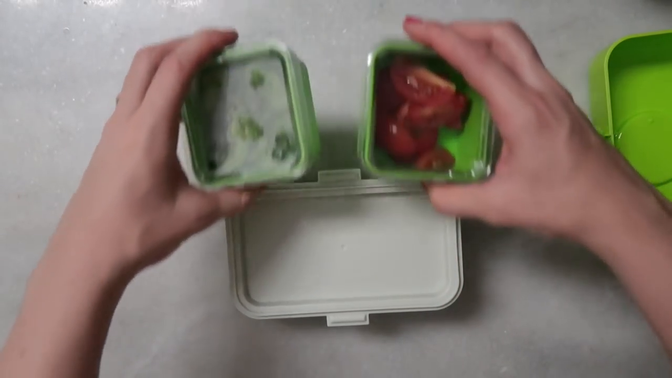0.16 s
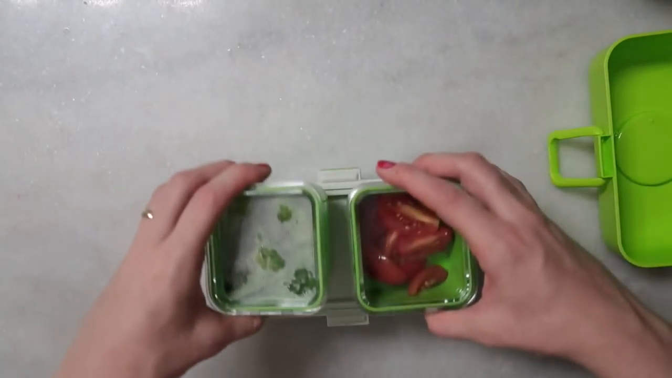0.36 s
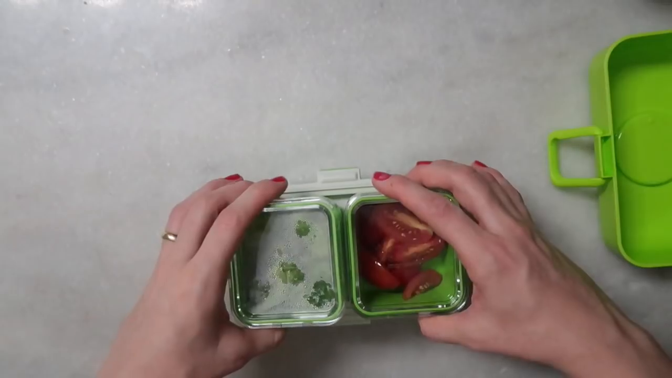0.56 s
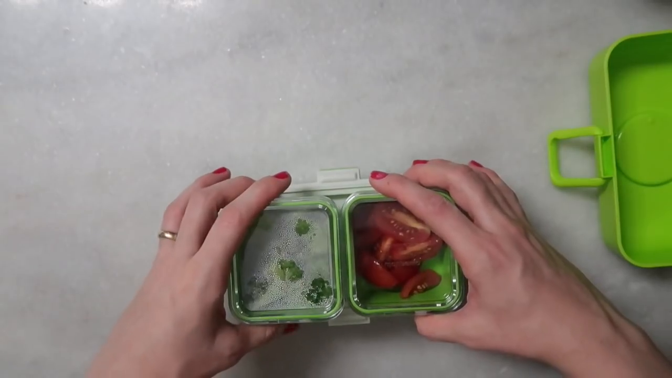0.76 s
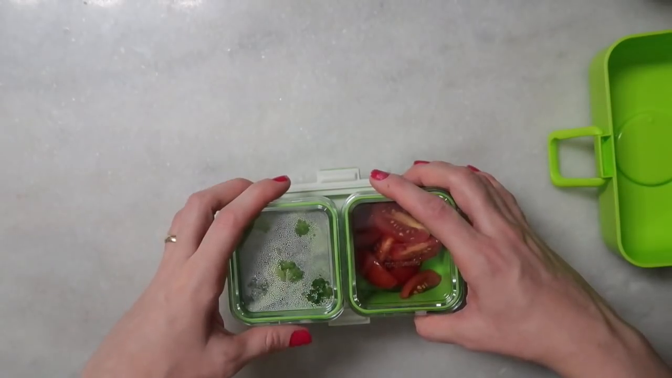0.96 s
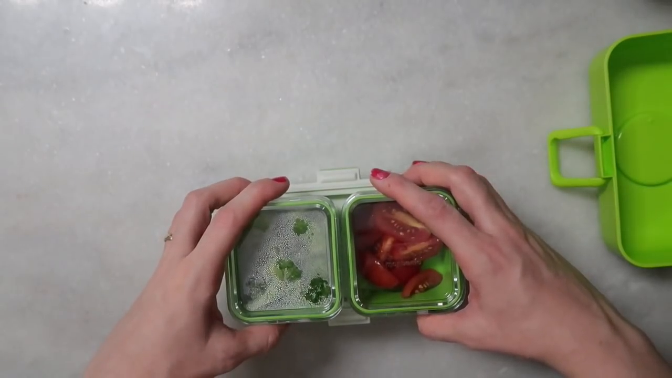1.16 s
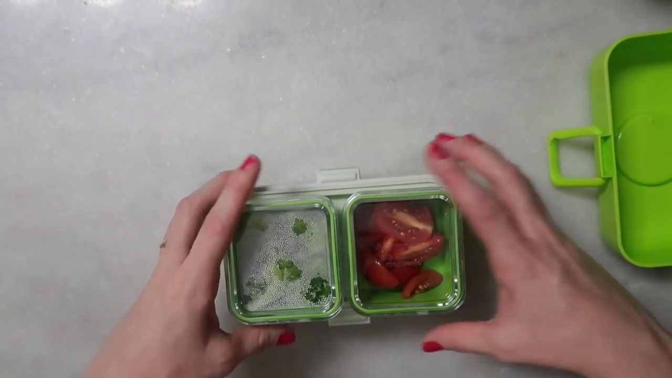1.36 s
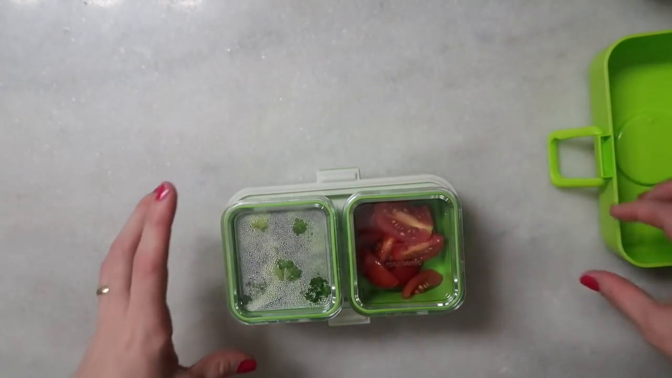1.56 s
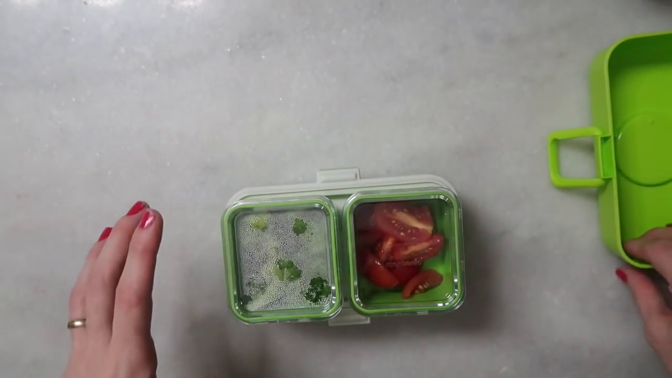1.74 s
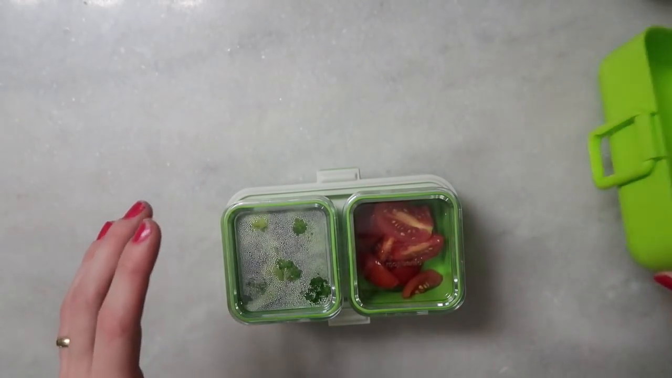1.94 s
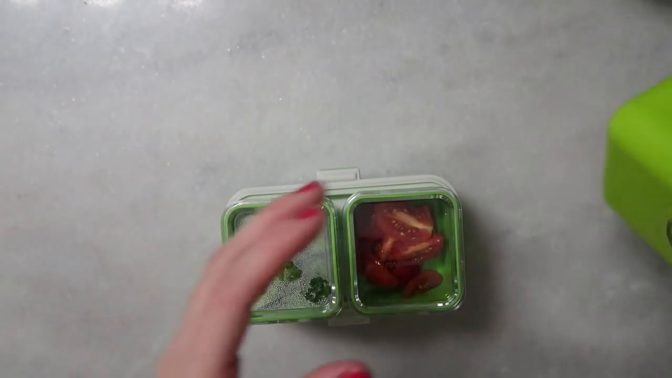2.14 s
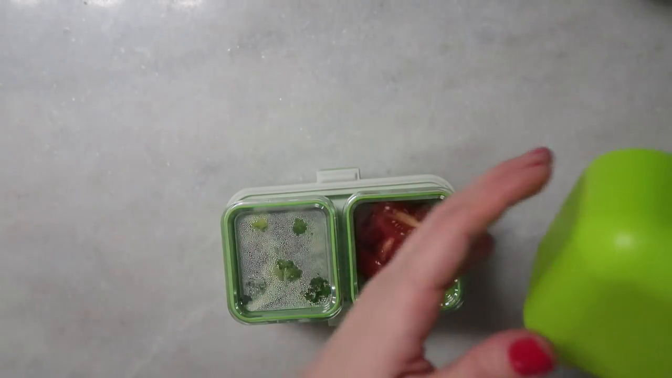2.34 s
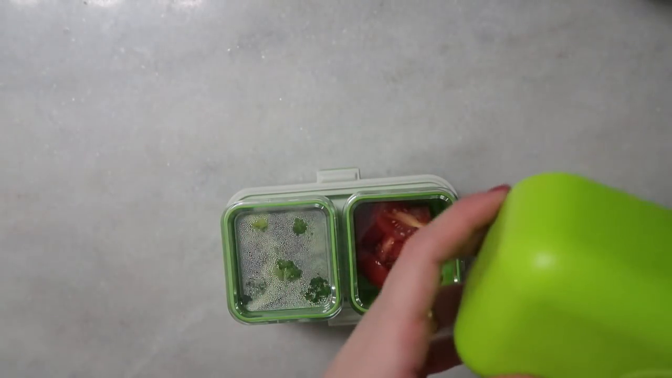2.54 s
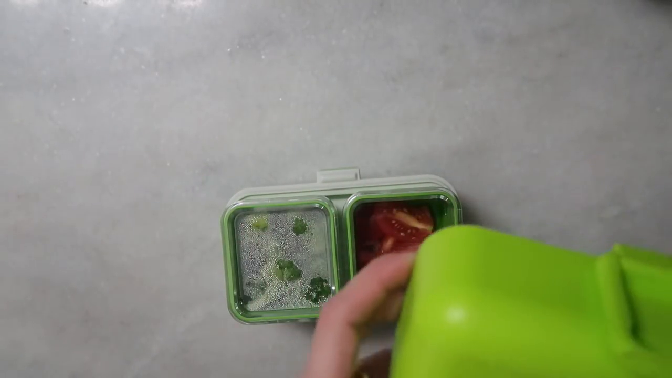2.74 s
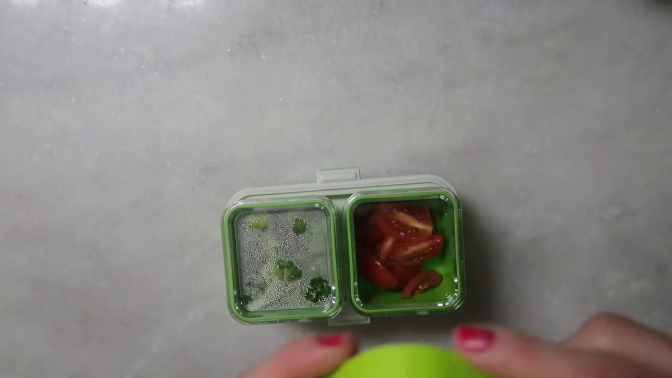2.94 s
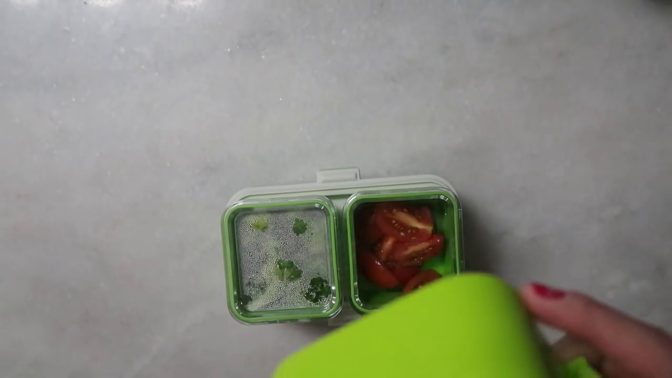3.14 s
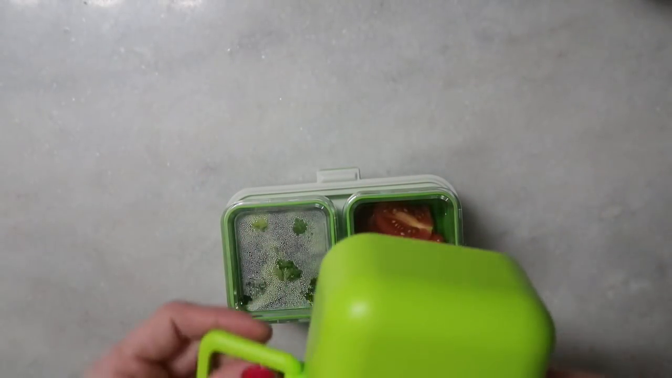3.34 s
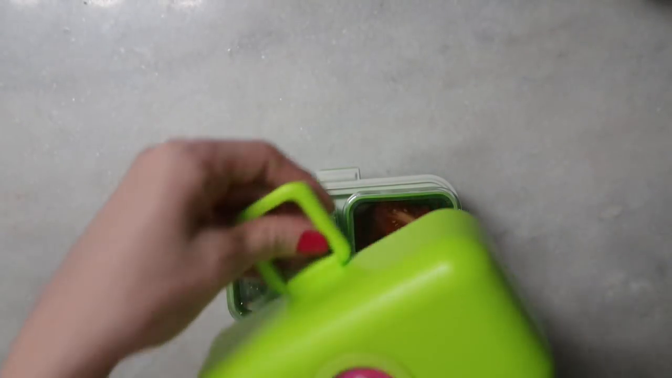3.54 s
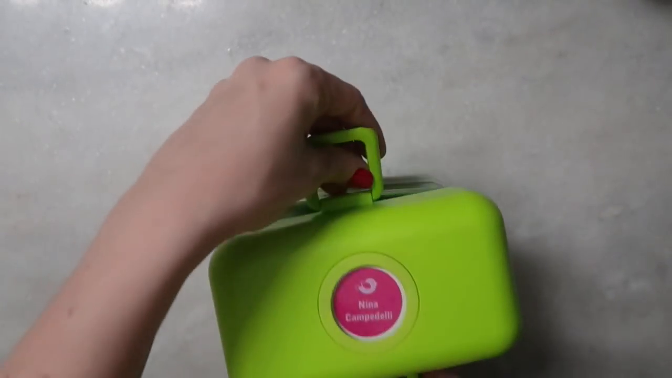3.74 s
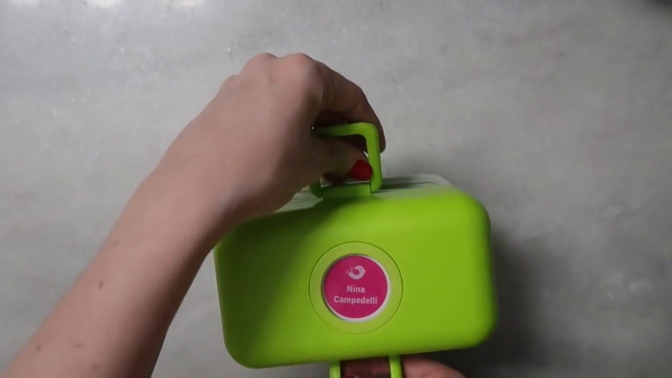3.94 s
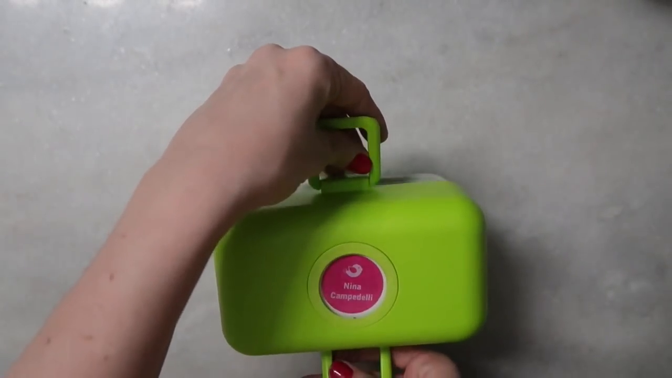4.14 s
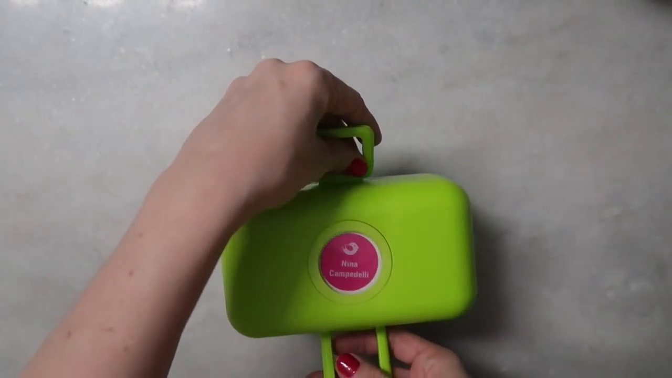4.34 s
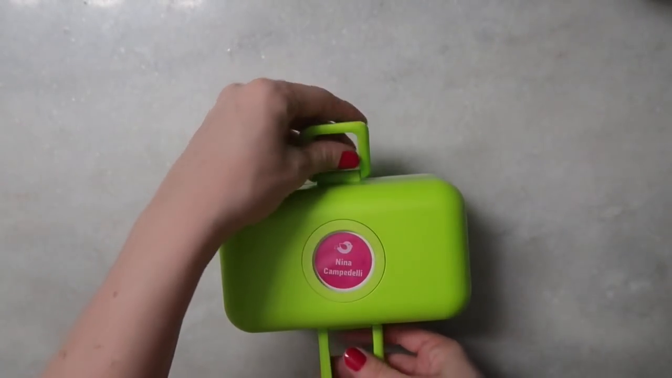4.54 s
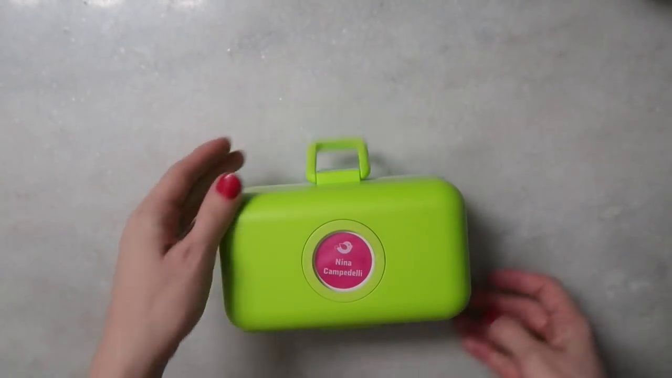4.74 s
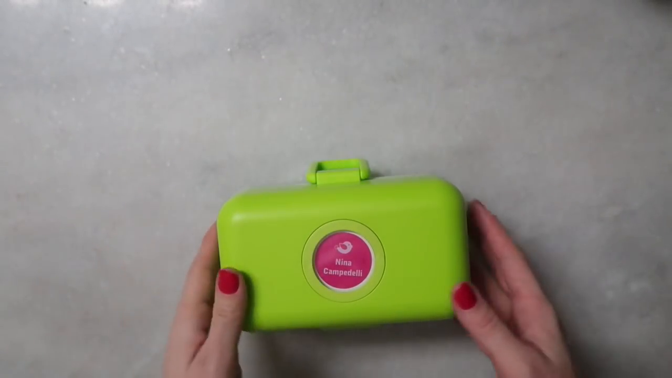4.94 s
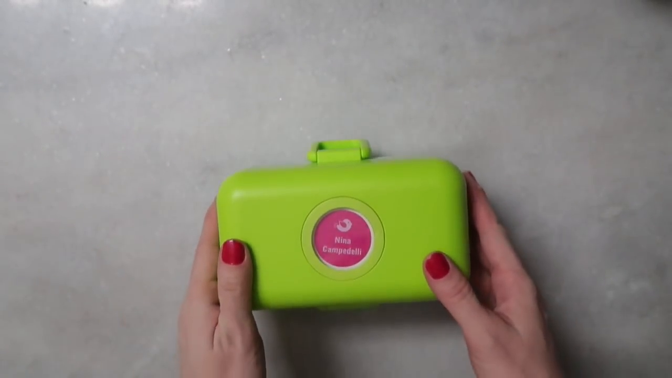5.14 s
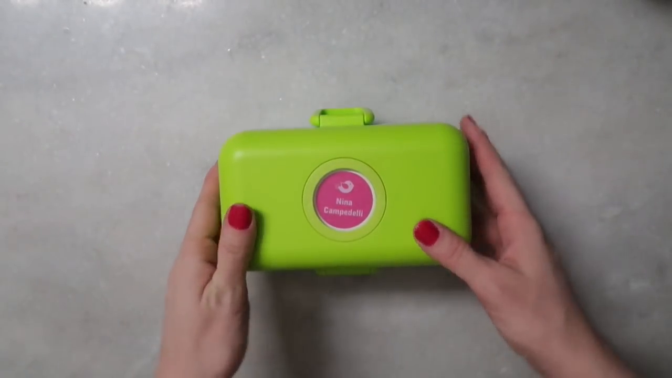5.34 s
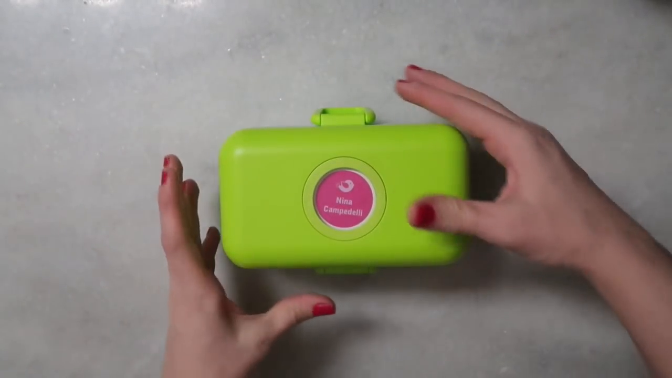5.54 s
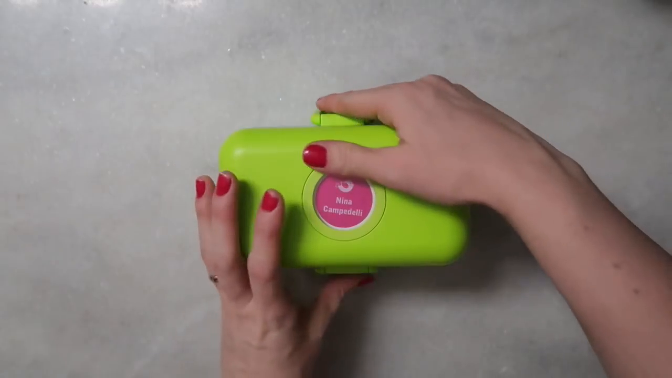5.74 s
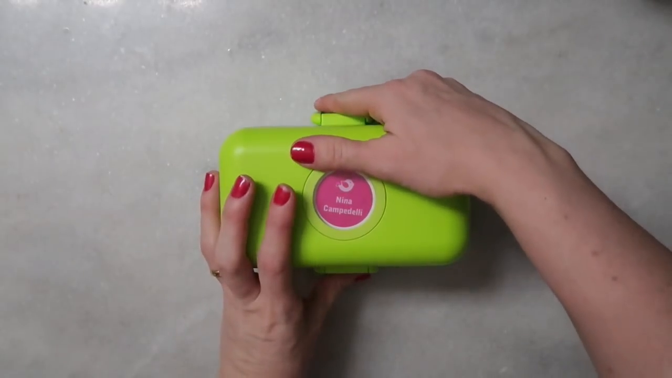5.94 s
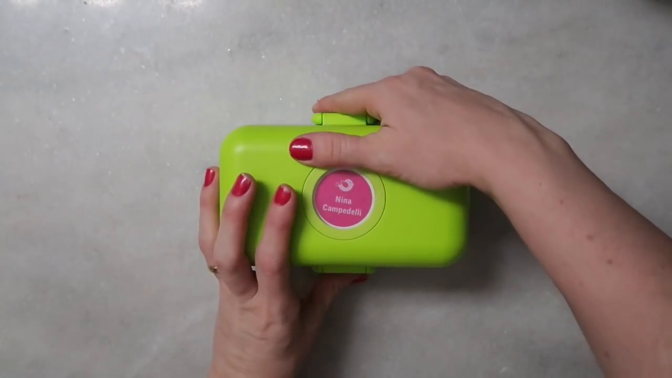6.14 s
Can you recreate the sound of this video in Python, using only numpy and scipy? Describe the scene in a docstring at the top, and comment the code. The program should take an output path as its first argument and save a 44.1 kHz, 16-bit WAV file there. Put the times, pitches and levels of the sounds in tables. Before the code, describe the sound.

Hollow plastic tubs knock into a lunch box, the lid scrapes and clacks, is seated with squeaky judders, and a latch snaps shut in an echoing kitchen.

```python
"""Hollow plastic knocks, scrapes and a hard latch snap, heard close up in an echoing kitchen over a low hum.
Two small tubs are set into a lunch box on a stone counter; the hollow lid is scraped off the counter,
turned over in the hands with its clasps swinging, seated on the box and latched.
Blows ring damped wall modes; plastic sticks and slips in pulse trains that excite the same modes;
skin is grainy filtered noise, the echo a set of decaying noise bands, the room tone steady coloured noise."""
import sys
import numpy as np
from scipy import signal
from scipy.fft import rfft, irfft
from scipy.io import wavfile
from scipy.ndimage import uniform_filter1d

SR = 44100
rng = np.random.default_rng(int(sys.argv[2]) if len(sys.argv) > 2 else 0)


def int16_out(signal):
    """Quantize to a 16-bit WAV file."""
    q = np.round(np.clip(np.atleast_2d(signal).T, -1, 1) * 32767)
    wavfile.write(sys.argv[1], SR, q.astype(np.int16))


N = 277356
T = np.arange(N) / SR
RING_T = T[:8192]  # time axis of one blow
TOP_HZ = 15800  # upper edge of the ticks and of the recorder

# colour of the burst of crowded small modes at a contact: f/Hz, relative level/dB
CRACK_COLOUR = [(250, -13.5), (800, 0.5), (2300, 6.5), (3200, -5.5), (4200, -4), (6000, -6), (9000, -19.5),
                (12500, -23), (16000, -43)]
# difference between the two microphone ports: f/Hz, side minus mid/dB (held to 0 dB at most in ports)
PORT_WIDTH = [(60, -38), (110, -11), (200, -28), (380, -32.5), (700, -31), (1290, -22.5), (2380, -12.5),
              (4400, -5), (8120, 0), (15000, 28)]


def undb(db):
    """Decibels to gain."""
    return 10 ** (np.asarray(db) / 20)


def level(x, db):
    """Set a steady sound to an rms level."""
    return x * undb(db) / np.sqrt(np.mean(x ** 2))


def burst(x, db):
    """Give a short sound the energy of 10 ms at this rms level."""
    return x * undb(db) * np.sqrt(.01 * SR / (np.sum(x ** 2) + 1e-18))


def along(hz, points, axis=1):
    """Read one column of a table on a log-frequency axis."""
    points = np.array(points, float)
    return np.interp(np.log(np.maximum(hz, 1)), np.log(points[:, 0]), points[:, axis])


def colour(x, points):
    """Filter a sound by a curve of (Hz, dB) points."""
    hz = np.fft.rfftfreq(len(x), 1 / SR)
    return irfft(rfft(x) * undb(along(hz, points)), len(x))


def band(x, lo_hz, hi_hz, order=3):
    """Causal band-pass."""
    edges = [lo_hz, min(hi_hz, SR / 2 - 1000)]
    return signal.sosfilt(signal.butter(order, edges, "band", fs=SR, output="sos"), x)


def add(track, s, x):
    """Mix a sound in at a time in seconds."""
    i = max(int(s * SR), 0)
    x = x[..., :track.shape[-1] - i]
    track[..., i:i + x.shape[-1]] += x


def walk(rate):
    """Smooth random drift with a spread near 1, drawn afresh rate times a second."""
    k = int(SR / rate)
    steps = np.repeat(rng.standard_normal(N // k + 1), k)
    return 0.92 * uniform_filter1d(steps, k)[:N]


def ports(mid, side, width):
    """Left and right of close ports: mostly the treble differs, never by more than unrelated sound would."""
    side = colour(side, [(hz, min(db, 0)) for hz, db in width])
    return np.array([mid + side, mid - side])


def room_tone(waver_db=1.5):
    """Still air as wavering coloured noise, and an appliance humming in narrow resonances."""
    # still air: f/Hz, relative level/dB
    air = [(13, -36.5), (22, -14.5), (106, -2), (236, -8.5), (310, -16), (366, -3.5), (420, -14),
           (771, -17), (988, -21), (1710, -24), (2140, -26), (2450, -25), (11500, -43), (14300, -59),
           (16000, -67)]
    # side against mid of the air: f/Hz, level/dB
    air_width = [(60, -20.5), (110, -23.5), (200, -5.5), (380, -4.5), (700, -3), (1290, 0), (2380, -2),
                 (4400, 12), (8120, 3), (15000, 17)]
    # kitchen appliance's hum: f/Hz, width/Hz, level/dB
    hum_bands = [(61.1, 5.2, -64), (99.43, 3.3, -60), (365.6, 75, -54)]
    air_db = -50.5  # before the stereo spread and the waver
    mid, side = (level(colour(rng.standard_normal(N), air), air_db) for _ in range(2))
    hum = 0
    for hz, width, db in hum_bands:
        hum = hum + level(band(rng.standard_normal(N), hz - width / 2, hz + width / 2, order=2), db)
    return ports(mid, side, air_width) * undb(waver_db * walk(2.148)) + hum


def sliding():
    """Gain of the rubbing skin: a faint rustle from holding, and strokes that gather speed, hold and stop."""
    # fingers sliding over the plastic: start t/s, length/s, level added over the hold/dB
    strokes = [(0.337, 0.63, -65), (2.46, 0.11, -61), (2.59, 0.14, -54.5), (2.854, 0.13, -51),
               (2.943, 0.16, -41.5), (3.075, 0.052, -41.5), (3.248, 0.55, -54), (3.783, 0.14, -52.5),
               (5.196, 0.27, -64), (5.74, 0.19, -58)]
    hold_db = -70
    attack, release = 0.29, 0.44  # shares of a stroke's length
    gain = np.full(N, undb(hold_db))
    for s, length, db in strokes:
        done = np.linspace(0, 1, int(length * SR))
        swell = np.minimum(np.minimum(done / attack, (1 - done) / release), 1)
        add(gain, s, undb(db) * swell)
    return gain


def fingers(grain_db=3, catch_db=2, skid_width=0.17):
    """Skin catches and lets go on the shell: a grainy hiss, and a narrow swish where a fingertip skids."""
    # skin on plastic: f/Hz, relative level/dB
    rub_colour = [(300, 9.5), (700, -4), (1000, 6.5), (1600, 11), (3000, 1.5), (4500, -0.5), (6300, -4),
                  (9000, -9.5), (13000, -11), (16000, -23)]
    # side against mid of the rubbing: f/Hz, level/dB
    rub_width = [(60, -28), (110, -22), (200, -18), (380, -9.5), (700, -4.5), (1290, -27), (2380, -26),
                 (4400, -6.5), (8120, -6), (15000, -2)]
    # fingertip skidding over the smooth shell: middle t/s, length/s, level before the swell/dB, f/Hz
    skids = [(2.984, 0.12, -56, 6460), (3.077, 0.15, -67, 12300), (3.385, 0.1, -49.5, 5670),
             (3.479, 0.081, -54, 5340), (3.687, 0.089, -57.5, 6180), (3.795, 0.11, -58.5, 5700),
             (3.862, 0.048, -51, 5950), (5.79, 0.18, -69, 13000)]
    grains = undb(grain_db * walk(900) + catch_db * walk(45))
    noise = rng.standard_normal((2, N)) * grains
    hiss = np.array([level(colour(channel, rub_colour), 0) for channel in noise]) * sliding()
    for s, length, db, hz in skids:
        swell = np.hanning(int(length * SR))
        noise = rng.standard_normal((2, SR // 4))
        swish = level(band(noise, hz * (1 - skid_width), hz * (1 + skid_width), order=2), db)
        add(hiss, s - length / 2, swish[:, :len(swell)] * swell[:swish.shape[1]])
    return ports(*hiss, rub_width)


def ring(modes, pitch=1, scatter_db=3.5, detune=0.012):
    """Damped modes; each contact weighs and tunes them a little differently."""
    hz, db, t60 = np.array(modes, float).T[:, :, None]
    size, shift = rng.standard_normal((2, len(hz), 1))
    waves = np.sin(2 * np.pi * hz * pitch * (1 + detune * shift) * RING_T)
    decay = undb(db + scatter_db * size - 60 * RING_T / t60)
    return np.sum(decay * waves, axis=0)


def crowded(fade, points):
    """A burst of very many small modes, so close together that they fill the spectrum evenly."""
    spectrum = rfft(rng.standard_normal(len(fade)) * fade)
    even = irfft(spectrum / (np.abs(spectrum) + 1e-18), len(fade))  # keep the phases, flatten the levels
    return colour(even, points) * np.sqrt(np.sqrt(fade))


def contacts(table, sharp_db):
    """Each blow and its weaker, softer second corner: s, pitch factor, flex dB, clack dB, tick dB."""
    corner_db, corner_hardness_db = -7.5, -5
    # past a threshold the plastic snaps and the tick grows faster (dB per dB)
    tick_db, snap_from_db, snap_growth = -15.5, -20.5, 1.1
    for s, db, hardness_db, pitch, lag in table:
        corners = [(s, db, hardness_db)]
        if lag > .001:  # a shorter lag counts as a flat landing
            corners.append((s + lag, db + corner_db, hardness_db + corner_hardness_db))
        for at, flex_db, hard_db in corners:
            clack_db = flex_db + hard_db
            snap_db = snap_growth * max(clack_db - snap_from_db, 0)
            yield at, pitch, flex_db, clack_db, clack_db + tick_db + sharp_db + snap_db


def blows(table, modes, crack_colour, crack_t60, crack_db, gain_db,
          side_db=-8, contact_s=0.001, bass_hz=270, sharp_db=0):
    """Blows on one object: the walls flex, the stiff corners clack, the edge ticks, each in its own band.

    crack_db = crowded small modes against the clear ones in each band; sharp_db = extra tick of a thin edge.
    crack_t60 sets the fade from which the crowded burst is shaped."""
    out = np.zeros((2, N))
    push = 1 - np.exp(-RING_T / contact_s)  # the plastic gives a little as it is met
    fade = undb(-60 * RING_T / crack_t60)
    radiation = signal.butter(2, bass_hz, "high", fs=SR, output="sos")  # small walls radiate little bass
    edges = [250, 1350, 4200, TOP_HZ]  # Hz: flex, clack, tick
    for s, pitch, *levels in contacts(table, sharp_db):
        crack, apart = (crowded(fade, crack_colour) for _ in range(2))
        mid = side = 0
        for lo, hi, db, share_db in zip(edges, edges[1:], levels, crack_db):
            own = [mode for mode in modes if lo <= mode[0] < hi]
            tone = burst(ring(own, pitch), 0) if own else 0
            motion = push * (tone + burst(band(crack, lo, hi, order=2), share_db))
            mid = mid + burst(signal.sosfilt(radiation, motion), db)
            side = side + burst(push * band(apart, lo, hi), db + side_db)
        add(out, s, ports(mid, side, PORT_WIDTH))
    return out * undb(gain_db)


def judders(table, modes, slip_db=7):
    """A tight fit slides in quick slips that keep the walls ringing: even slips squeak, uneven ones scrape."""
    out = np.zeros(N)
    for s, length, db, first_rate, last_rate, uneven, top_hz in table:
        count = int(length * (first_rate + last_rate) / 2)
        wait, size = uneven * rng.standard_normal((64, 2))[:count].T
        times = np.cumsum(np.exp(wait) / np.linspace(first_rate, last_rate, count))
        slips = np.zeros(len(RING_T))
        places = np.minimum((times - times[0]) * SR, len(slips) - 1).astype(int)
        slips[places] = undb(slip_db * size)
        sound = band(signal.fftconvolve(slips, ring(modes)), 210, top_hz, order=2)
        add(out, s, sound * undb(db) * np.sqrt(length * SR / np.sum(sound ** 2)))
    return out


def tubs():
    """Soft tub walls flex and boom as they are set into the box, squeaking where the fit is tight."""
    # blows: t/s, flex level over 10 ms before the gain/dB, hardness as clack over flex/dB,
    # pitch factor from the grip, lag until the opposite corner lands/s
    hits = [(.6035, -21.5, -28, 0.95, 0), (.6085, -15, -17.5, 1.0, 0.0049), (.632, -26, -32, 0.91, .005),
            (.668, -21.5, -19, .9, 0), (.678, -24, -28, 0.913, 0.00018), (.704, -14, -12, 0.94, 0.0026),
            (.78, -27.5, -20, 0.78, 0), (.806, -25, -17, 0.913, 0), (.831, -13.5, -9, 0.928, 0.0042),
            (.8555, -18.5, -10.5, 0.98, 0), (1.2395, -28, -7.5, .89, 0.0021),
            (1.392, -49, 0.5, 0.98, 0.0069), (1.43, -44, -22, 0.68, 0)]
    # sticking and slipping: t/s, length/s, level/dB, first and last slip rate/Hz, unevenness, highest f/Hz
    slips = [(.003, .04, -46, 930, 1020, 0.11, 1160), (.779, .033, -28, 410, 257, 0.037, 1120),
             (.862, 0.0276, -43, 500, 480, 0.56, 3000)]
    # tub modes: f/Hz, relative level/dB, t60/s
    modes = [(332, -36, 0.032), (521, -6.5, 0.045), (584, 7.5, 0.027), (680, 5, 0.026), (1092, -7, 0.031),
             (1170, -42, 0.013), (1850, 3, 0.01), (1960, -2.5, 0.011), (2320, -4.5, 0.018),
             (2860, -24, 0.013), (3820, -19, 0.0098)]
    knocks = blows(hits, modes, CRACK_COLOUR, crack_t60=0.022, crack_db=(-16, -5, 0),
                   gain_db=-3, contact_s=0.0019)
    return knocks + judders(slips, modes)


def lid():
    """The hollow lid clacks and scrapes in thin-wall modes, a touch louder on the left."""
    # blows: t/s, flex level over 10 ms before the gains/dB, hardness as clack over flex/dB,
    # pitch factor from the grip, lag until the opposite corner lands/s
    hits = [(1.715, -29, -3, 0.91, .004), (1.723, -24, -0.5, .94, .0075),
            (1.746, -29.5, -0.5, 0.93, 0.00018), (1.798, -31, -16, 1.0, 0.00062),
            (1.8805, -21.5, -2.5, 0.97, .005), (1.9248, -24.5, 0, 0.99, 0.0023), (1.9685, -20, 5.5, .9, 0),
            (2.059, -34, 14.5, 0.86, 0), (2.733, -35.5, 0, 0.85, 0.00089), (2.898, -48, 5, 0.83, 0.0013),
            (2.9965, -35, -12, .86, 0.0039), (3.261, -40.5, -4, 0.84, 0), (3.376, -41.5, -8, 0.89, 0),
            (3.425, -42, -17, 0.85, 0.00065), (3.795, -43, -7, 1.0, 0.017),
            (3.861, -43.5, 1.5, 0.92, 0.012)]
    # sticking and slipping: t/s, length/s, level before the left-right tilt/dB, first and last slip rate/Hz,
    # unevenness, highest f/Hz
    slips = [(1.724, 0.035, -31, 700, 500.5, 0.53, 3330), (1.79, 0.028, -37, 489, 493, 0.83, 1990),
             (1.886, 0.021, -36.5, 603, 490, 0.8, 3000), (1.929, 0.03132, -33.5, 594, 388, .7, 2970),
             (6.205, 0.0058, -36, 894, 864, 0.43, 3020)]
    # lid modes: f/Hz, relative level/dB, t60/s
    modes = [(426, -10, 0.029), (579, -1, 0.01), (935, -14, 0.023), (1120, -8, 0.025), (1216, 2.5, 0.028),
             (1510, -23, 0.0048), (1734, 2, 0.021), (1876, 6, 0.012), (2130, 0, .022), (2580, 2, 0.02),
             (3173, -10.5, 0.056), (3410, 3.5, 0.0044), (5060, -6, 0.013), (5590, 5, 0.0083),
             (7500, 8.5, 0.0031)]
    knocks = blows(hits, modes, CRACK_COLOUR, crack_t60=0.018, crack_db=(-4, 2, 3),
                   gain_db=0.5, contact_s=0.00093)
    tilt_db = [[.4], [-.4]]  # left, right
    return (knocks + judders(slips, modes)) * undb(tilt_db)


def thuds(rattle_db=-4):
    """The shell bumps as a whole on the counter: a low, slightly rough ring."""
    # bumps: t/s, level over 10 ms/dB, f/Hz, t60/s
    bumps = [(1.722, -38, 200, .058), (1.745, -35, 170.6, 0.24), (1.825, -42, 139, 0.073),
             (1.931, -38, 347, 0.2), (3.261, -39.5, 304, 0.021), (4.472, -28, 206, 0.071),
             (4.487, -34, 310, 0.034), (4.757, -31.5, 71.3, 0.01), (5.121, -38, 281, .038),
             (5.853, -35.5, 308, 0.081), (6.21, -32, 264, 0.095)]
    out = np.zeros(N)
    for s, db, hz, t60 in bumps:
        noise = rng.standard_normal(len(RING_T)) * undb(-60 * RING_T / t60)
        rattle = band(noise, hz / 2, hz * 1.42, order=2)
        tone = ring([(hz, 0, t60)])
        add(out, s, burst(burst(tone, 0) + burst(rattle, rattle_db), db))
    return out


def clasps():
    """Swinging clasps strike with a hard clack and the sharp tick of a thin edge."""
    # blows: t/s, flex level over 10 ms/dB, hardness as clack over flex/dB,
    # pitch factor from the grip, lag until the opposite corner lands/s
    hits = [(3.1534, -20.5, 7, 0.99, 0.0016), (6.2112, -28, 1, 0.93, 0), (6.2148, -25, 3.5, 0.98, 0.0099)]
    # clasp modes: f/Hz, relative level/dB, t60/s
    modes = [(740, -18, 0.018), (934, 8.5, 0.016), (1270, 4, 0.019), (1560, -3, 0.022), (1740, 3.5, 0.0099),
             (1866, 6.5, 0.015), (2150, 0, 0.025), (2535, -1, 0.013), (3085, -29, 0.0078),
             (3550, -15, 0.013), (4040, 2.5, 0.016), (4470, -4, 0.019), (5660, 0.5, 0.014),
             (6800, -10, 0.008), (7830, -5.5, 0.0094), (9200, -16, 0.008)]
    return blows(hits, modes, CRACK_COLOUR, crack_t60=0.014, crack_db=(-3, 2, 2),
                 sharp_db=5, gain_db=0.0, side_db=-7.5)


def box():
    """The lid being seated rings the box walls and judders along the tight rim."""
    # blows: t/s, flex level over 10 ms before the gain/dB, hardness as clack over flex/dB,
    # pitch factor from the grip, lag until the opposite corner lands/s
    hits = [(4.002, -22, -10, 0.93, 0), (4.0402, -12, -7.5, 1.0, 0.00091), (4.181, -28, -19, 0.98, 0.00097),
            (4.191, -34, -4, 0.93, 0.0027), (4.296, -35.5, -3.5, .95, 0.0013),
            (4.3412, -24.5, -15, 1.05, 0), (4.4022, -16, -6, .99, 0.0047), (4.4737, -16, -5, 0.93, 0.0075),
            (4.487, -20.5, -9, .77, 0.018), (5.1215, -43, -4.5, 0.89, 0), (5.15, -42.5, -14, 0.92, 0),
            (5.762, -43, -10.5, 0.77, 0.0058), (5.793, -40.5, -9, 0.8, 0.0022), (5.8528, -33, -8, 0.87, 0)]
    # sticking and slipping: t/s, length/s, level/dB, first and last slip rate/Hz, unevenness, highest f/Hz
    slips = [(4.006, 0.02, -29.5, 797, 925, 0.036, 1060), (4.056, .035, -34, 693, 735, .03, 990),
             (4.1, .07, -40, 794, 660, 0.028, 1000), (4.18, 0.062, -33.5, 550.4, 494, 0.26, 1010),
             (4.346, 0.021, -29, 650, 730, 0.022, 900), (4.478, 0.038, -28.5, 506.8, 345.5, .7, 3000)]
    # box modes: f/Hz, relative level/dB, t60/s
    modes = [(383, -22, 0.02), (511, -7.5, 0.058), (564, 6.5, 0.026), (682, 3, 0.022), (731.5, -20, 0.22),
             (885, -8.5, 0.023), (1152, -3.5, 0.017), (1625, 4.5, 0.012), (1797, -9.5, 0.03),
             (2303, 7.5, 0.011), (2390, -31, 0.01), (3600, -32, 0.013), (5230, -1.5, 0.015),
             (5660, 1, 0.0074)]
    knocks = blows(hits, modes, CRACK_COLOUR, crack_t60=0.021, crack_db=(-10, -1, 1),
                   gain_db=2.5, contact_s=0.00076)
    return knocks + judders(slips, modes)


def latch():
    """The latch snaps shut: short, bright modes under a crack of its own colour."""
    # blows: t/s, flex level over 10 ms before the gain/dB, hardness as clack over flex/dB,
    # pitch factor from the grip, lag until the opposite corner lands/s
    hits = [(4.757, -7.5, -4.5, 1.0, 0), (4.858, -27, -14, 1.0, 0), (4.873, -13, -8, 1.0, 0)]
    # latch modes: f/Hz, relative level/dB, t60/s
    modes = [(382.1, -19, 0.024), (459, -3, 0.027), (510, -0.5, 0.031), (1197, -1.5, 0.0067),
             (1370, -1, 0.023), (1956, -22, .01), (2206, 14, .013), (2610, 4, 0.014), (3330, -8, .008),
             (3740, 14.5, 0.014), (3960, 17, 0.0091), (4120, -6, 0.013), (5030, 11, 0.0082),
             (6150, 10, 0.014), (7330, 21, 0.006), (8100, 9.5, .007), (10100, -1, 0.0055)]
    # crowded small modes of the snap: f/Hz, relative level/dB
    snap_colour = [(250, -30), (800, 12), (2300, 9.5), (3100, 10.5), (4100, 0.5), (6000, 13), (9000, -2.5),
                   (12500, -5.5), (16000, -21.5)]
    return blows(hits, modes, snap_colour, crack_t60=.01, crack_db=(-14, -1, 4), gain_db=1.5, side_db=-11)


def kitchen(x, build_s=0.0037, early_db=4, early_s=0.028, sideways_db=5):
    """Near reflections and a diffuse tail, strongest early on, whose treble dies soonest."""
    # kitchen echo: f/Hz, relative level/dB, t60/s
    echo = [(99, -21.5, 0.34), (254.2, -7.5, 0.69), (525, -12, 0.71), (1090, -3, 0.7), (2000, -8.5, 0.68),
            (3910, -9, 0.62), (8175, -14, 0.38), (16000, -32, 0.2)]
    # counter and nearby surfaces: delay/s, gain
    reflections = [(.0043, 0.017), (.009, 0.07)]
    t = T[:SR]
    build = 1 - np.exp(-(t / build_s) ** 2)
    tails = np.zeros((2, len(t)))
    for hz in 125 * 2 ** np.arange(0, 7.1, .5):  # half-octave bands
        decay_db = -60 * t / along(hz, echo, axis=2) + early_db * np.exp(-t / early_s)
        shape = undb(decay_db) * build
        noise = band(rng.standard_normal((2, len(t))), hz / 2 ** (1 / 4), hz * 2 ** (1 / 4))
        tails += noise * shape / np.sqrt(np.sum(shape ** 2)) * undb(along(hz, echo))
    response = ports(*tails, PORT_WIDTH)
    for delay, gain in reflections:
        add(response, delay, np.array([gain]))
    # the walls also get what the plastic radiates sideways
    heard = x.mean(axis=0) + undb(sideways_db) * (x[0] - x[1]) / 2
    return signal.fftconvolve(heard[None], response, axes=1)[:, :N]


def scene():
    """Tubs in, lid over with its clasps swinging, lid seated, latch shut."""
    # each source and its send to the room in dB: what faces the microphone is heard with less of the room
    sources = [(tubs(), -1.0), (lid(), -0.06), (clasps(), -2.0), (box(), 0.23), (latch(), -4.0),
               (thuds() + fingers(), 0)]
    direct = sum(sound for sound, _ in sources)
    spread = sum(sound * undb(send_db) for sound, send_db in sources)
    return direct + kitchen(spread) + room_tone()


def record(dry):
    """Peaks past full scale overload the recorder and clip; a steep low-pass then cuts the top."""
    low_pass = signal.ellip(8, .2, 80, TOP_HZ, fs=SR, output="sos")
    return signal.sosfilt(low_pass, np.clip(dry, -1, 1))


dry = scene()
out = record(dry)
int16_out(out)
```